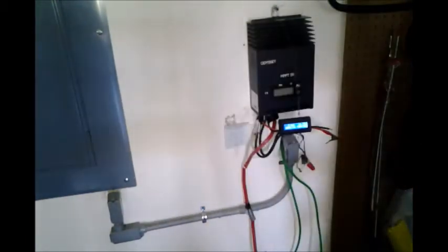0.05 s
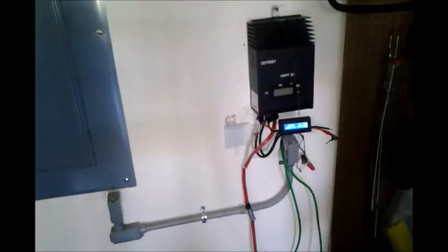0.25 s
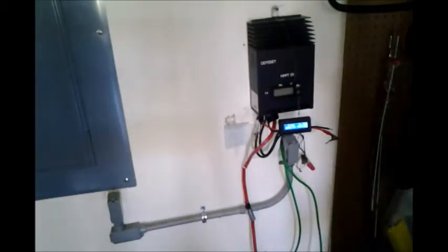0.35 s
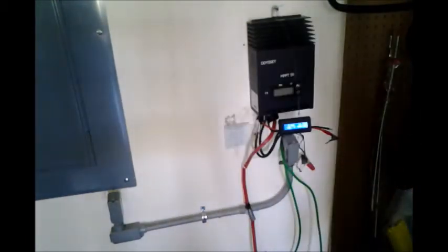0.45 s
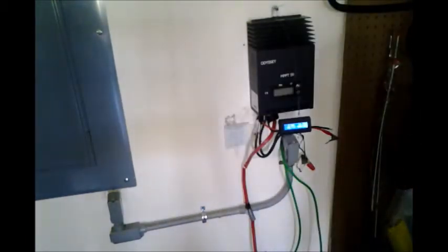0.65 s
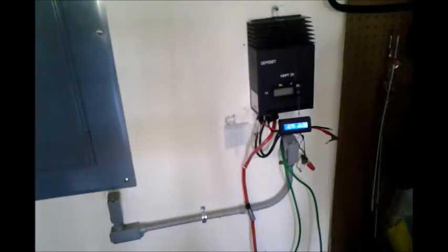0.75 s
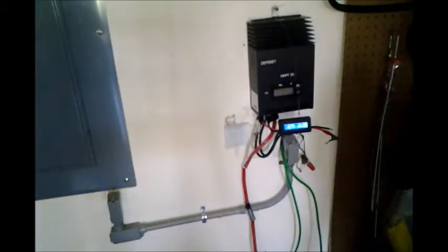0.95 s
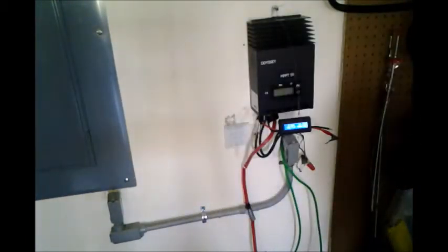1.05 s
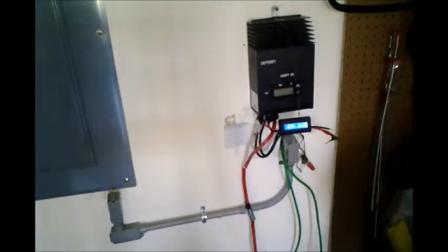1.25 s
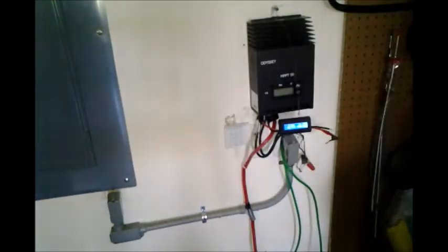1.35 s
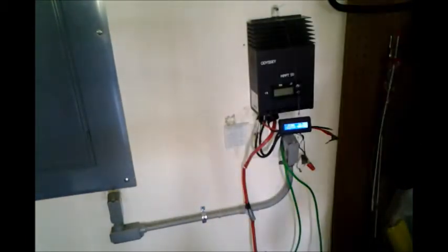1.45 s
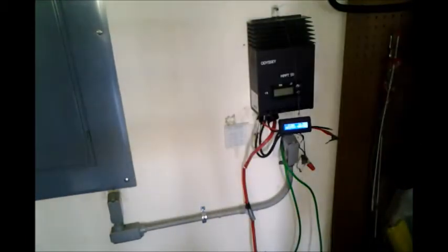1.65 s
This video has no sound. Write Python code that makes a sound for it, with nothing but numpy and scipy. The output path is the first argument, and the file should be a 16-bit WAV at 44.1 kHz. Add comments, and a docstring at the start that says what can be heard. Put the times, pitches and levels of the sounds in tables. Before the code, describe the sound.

In a hard-walled utility room, a switch snaps once with a short, woody click. Its echo rings and fades away, leaving only the microphone's steady hiss over a low rumble.

```python
"""In a bare utility room with hard walls, there is one sharp knock, probably a switch being thrown.
Its contact snaps and its housing gives a short, woody click, which bounces off the nearest surfaces
and then rings around the room for about a second. Two faint puffs of noise and a tiny tick are heard.
A mono microphone that misses the highest sounds adds steady hiss over a low rumble."""
import sys
import numpy as np
from scipy import signal
from scipy.fft import rfft, irfft
from scipy.io import wavfile

SR = 44100
rng = np.random.default_rng(int(sys.argv[2]) if len(sys.argv) > 2 else 0)


def log_audio(samples):
    """Write samples as a 16-bit WAV file to the path given in sys.argv[1]."""
    # one column per channel
    frames = np.atleast_2d(samples).T
    # limit to full scale, then quantise
    limited = np.clip(frames, -1, 1)
    pcm = np.round(limited * 32767).astype(np.int16)
    wavfile.write(sys.argv[1], SR, pcm)


N = 74970

KNOCK_S = 0.2464  # when the knock happens
# The tones of the switch and its housing: f/Hz, level/dB, time to fade by 60 dB/s
HOUSING_TONES = [(520, -33, 0.013), (1240, -11, .014), (1510, -9, .009), (1770, 2.5, 0.0148),
                 (1990, -8, 0.013), (2580, -8.5, 0.0068), (3300, -3.5, 0.0099)]
# Echoes from nearby surfaces: arrival t/s, level/dB next to the direct click, treble cutoff f/Hz
ECHOES = [(0.2484, 1.5, 2300), (0.2529, 1, 2400), (0.2598, 1.5, 3600), (0.2704, -5, 3020),
          (0.2832, -8.5, 2400), (0.3630, -12.5, 2600)]
def knock():
    """The contact snaps and the housing rings very briefly; nearby surfaces send back duller copies."""
    snap_hz, snap_width_hz = 3080, 1000  # a wider snap dies away sooner
    t = since(KNOCK_S)
    snap = gain(-19) * np.sin(2 * np.pi * snap_hz * t) * np.exp(-np.pi * snap_width_hz * t)
    housing = fading_tones(HOUSING_TONES, KNOCK_S)
    echoes = sum(gain(db) * cut_treble(fading_tones(HOUSING_TONES, at), hz) for at, db, hz in ECHOES)
    click = gain(-20) * (housing + echoes) / np.abs(housing).max()
    return cut_bass(snap + click, hz=1050)  # a small housing gives off little bass


# How strong the room's wash of echoes is at each pitch: f/Hz, level/dB
ROOM_COLOUR = [(120, -25), (230, -15), (320, -19.5), (420, -17), (560, -11.5), (950, -9), (1200, -4),
               (1750, -0.5), (2080, 0), (2280, -11.5), (2550, -6), (3450, -12), (4200, -19.5), (7000, -26)]
# How long that wash lasts at each pitch: f/Hz, time to fade by 60 dB/s
ROOM_FADE_TIMES = [(200, 1.3), (800, 1.126), (1800, 1.07), (3000, 0.97), (6000, 0.9)]
# Single tones that ring on after the click: f/Hz, level/dB, time to fade by 60 dB/s
ROOM_TONES = [(1152, -3, 0.41), (1253, -3.5, 0.98), (1347, -7.5, 1.3), (1479, -3, 0.82), (1492, -3, 0.87),
              (1660, -6.5, 1.1), (1714, 0.5, 1.3), (1813, -5, 1.55), (1900, -4.5, 1.6), (2020, -4.5, 1.3),
              (2105, -7.5, 0.74), (2478, -2, 0.27)]
def room_ring():
    """Countless echoes blur into a wash that fades, treble first; a few tones ring within it."""
    t, hz = since(KNOCK_S), np.fft.rfftfreq(N, 1 / SR)
    spectrum = rfft(noise(ROOM_COLOUR))
    centres_hz = 125 * 2 ** np.arange(0, 6.5, .5)  # bands half an octave apart
    wash = 0
    for centre, only_this_band in zip(centres_hz, np.eye(len(centres_hz))):
        band = irfft(spectrum * np.interp(hz, centres_hz, only_this_band), N)
        wash = wash + band * fade(t, value_at(ROOM_FADE_TIMES, centre))
    tones = fading_tones(ROOM_TONES, KNOCK_S)
    build_up = 1 - np.exp(-t / .008)  # the echoes take a moment to gather
    return (gain(-35) * wash + gain(-48.5) * tones) * build_up


# The two faint puffs of noise: start t/s, rise time/s, fall time/s, level/dB
PUFFS = [(0.192, 0.0022, .035, -57), (0.72, 0.022, 0.13, -58)]
# How strong the puffs are at each pitch: f/Hz, level/dB
PUFF_COLOUR = [(150, -4.5), (450, -4), (720, -1), (850, 4.5), (1000, -5), (1400, -8), (3000, -29)]
def puffs():
    """A faint, dull puff of noise comes just before the knock, and another as it fades."""
    loudness = 0
    for start, rise, fall, db in PUFFS:
        t = since(start)
        loudness = loudness + gain(db) * (1 - np.exp(-t / rise)) * np.exp(-t / fall)
    return loudness * noise(PUFF_COLOUR)


def tick(start_s=1.5027, fall_s=0.0095):
    """One tiny, dull tick: the signal jumps, then settles back."""
    t = since(start_s)
    return -gain(-42) * (t > 0) * np.exp(-t / fall_s)


# How strong the hiss is at each pitch: f/Hz, level/dB
HISS_COLOUR = [(1000, -29), (2000, -14.5), (3000, -8.5), (4200, -2.5), (5600, .5), (6700, -1.5),
               (7400, -5.5), (8000, -17.5)]
def microphone_hiss(flicker_db=0.57):
    """The microphone's own bright hiss, whose level flickers slightly."""
    flicker = normalise(cut_treble(rng.standard_normal(N), hz=26))
    return noise(HISS_COLOUR) * gain(-59 + flicker_db * flicker)


# How strong the soft noise is at each pitch: f/Hz, level/dB
SOFT_NOISE_COLOUR = [(60, 3.5), (150, 4.5), (280, 3), (600, -3.5), (1200, -5), (2000, -3), (3200, -1.5),
                     (5000, -4), (7800, -15)]
# Moments when it gets quieter: middle t/s, half the length/s, drop in level/dB
DIPS = [(0.172, .012, 6), (0.686, 0.0062, 7), (0.729, 0.0073, 4), (1.049, 0.013, 10), (1.476, 0.0072, 7)]
def soft_noise():
    """A soft rush, spread from bass to treble, that dips briefly now and then."""
    t = np.arange(N) / SR
    dip_db = sum(drop * np.exp(-((t - at) / half_length) ** 4) for at, half_length, drop in DIPS)
    return noise(SOFT_NOISE_COLOUR) * gain(-62.5 - dip_db)


# How strong the rumble is at each pitch: f/Hz, level/dB
RUMBLE_COLOUR = [(12, -6.5), (24, 0.5), (34, 1), (48, -7), (62, -10), (75, -5.5), (92, -15), (160, -22.5),
                 (300, -40.5)]
def rumble():
    """A steady, deep noise under everything else."""
    return noise(RUMBLE_COLOUR) * gain(-54.5)


def gain(db):
    """Turn decibels into a number to multiply by."""
    return 10 ** (np.asarray(db) / 20)


def normalise(x):
    """Scale a signal so that its average strength (rms) is 1."""
    return x / np.sqrt(np.mean(x ** 2))


def since(start_s):
    """Seconds since a moment, zero before it."""
    return np.maximum(np.arange(N) / SR - start_s, 0)


def fade(t, fade_s):
    """Die away by 60 dB, to a thousandth, every fade_s seconds."""
    return np.exp(-np.log(1000) * t / fade_s)


def fading_tones(tones, start_s):
    """Pure tones that start together, as when something is struck, and each die away."""
    t = since(start_s)
    return sum(gain(db) * np.sin(2 * np.pi * hz * t) * fade(t, fade_s) for hz, db, fade_s in tones)


def value_at(table, hz):
    """Read between the rows of a table by pitch, with every octave equally wide."""
    row_hz, values = np.array(table, float).T
    return np.interp(np.log(hz + 0.00078), np.log(row_hz), values)  # the tiny extra avoids log(0)


def noise(colour):
    """Noise of strength 1 with the given balance of low and high pitches."""
    hz = np.fft.rfftfreq(N, 1 / SR)
    strength = gain(value_at(colour, hz)) * (hz > 0)
    random_phases = np.exp(2j * np.pi * rng.random(len(hz)))
    return normalise(irfft(strength * random_phases, N))


def cut_treble(x, hz, order=2):
    """Turn down the sound above hz; a higher order cuts more steeply."""
    return signal.sosfilt(signal.butter(order, hz, fs=SR, output="sos"), x)


def cut_bass(x, hz):
    """Gently turn down the sound below hz."""
    return signal.sosfilt(signal.butter(1, hz, "high", fs=SR, output="sos"), x)


def scene():
    """Everything reaches one microphone, so left and right are the same."""
    mono = knock() + room_ring() + puffs() + tick() + microphone_hiss() + soft_noise() + rumble()
    return np.array([mono, mono])


def record(dry):
    """The microphone loses the high treble, and the recorder sharply cuts off the very top."""
    microphone_top_hz, recorder_top_hz = 7070, 7800
    softened = cut_treble(dry, microphone_top_hz, order=10)
    return signal.sosfilt(signal.ellip(10, .2, 70, recorder_top_hz, fs=SR, output="sos"), softened)


dry = scene()
out = record(dry)
log_audio(out)
```